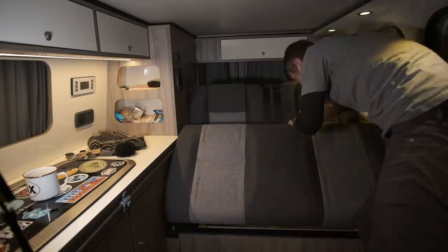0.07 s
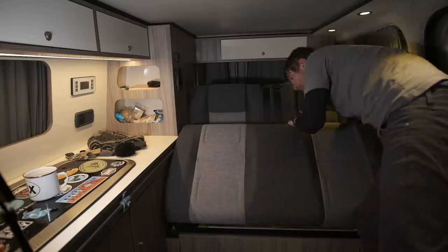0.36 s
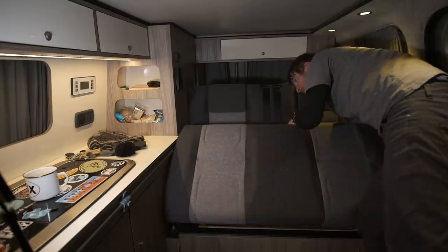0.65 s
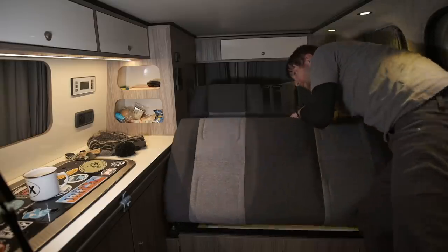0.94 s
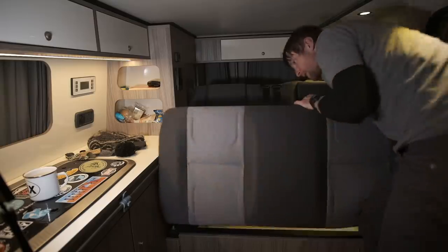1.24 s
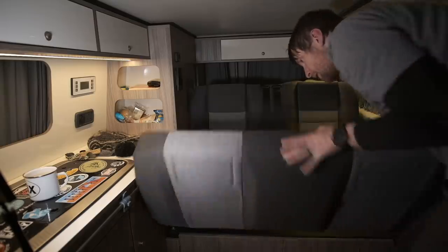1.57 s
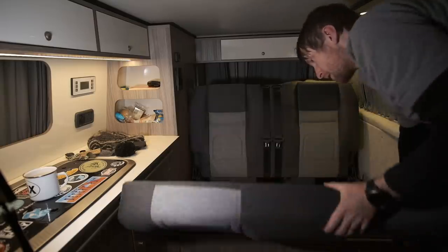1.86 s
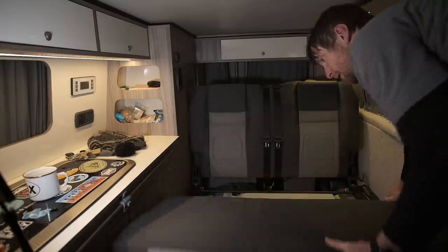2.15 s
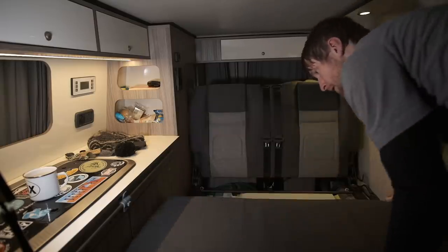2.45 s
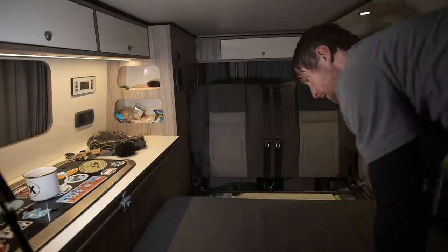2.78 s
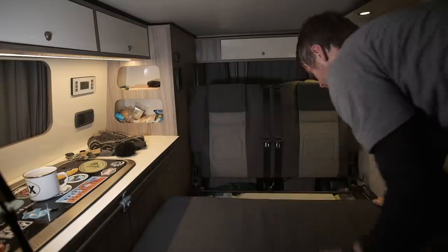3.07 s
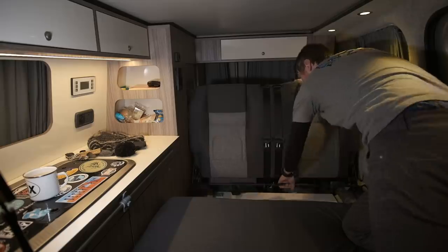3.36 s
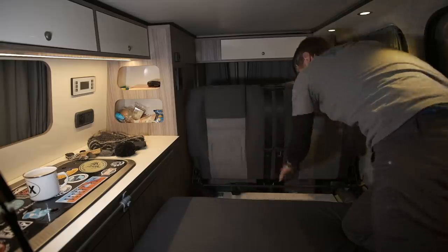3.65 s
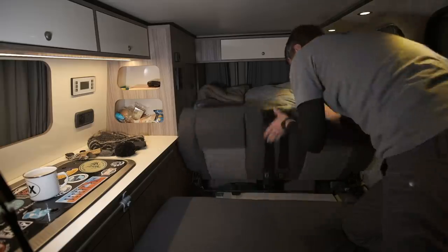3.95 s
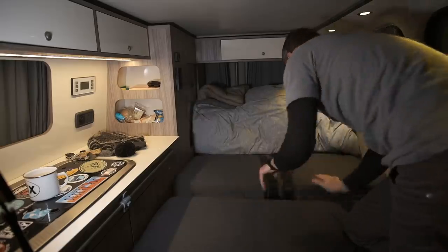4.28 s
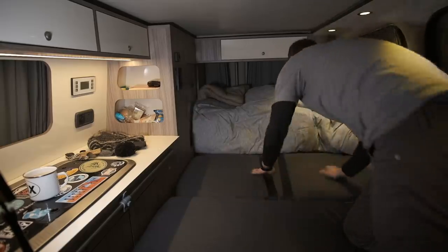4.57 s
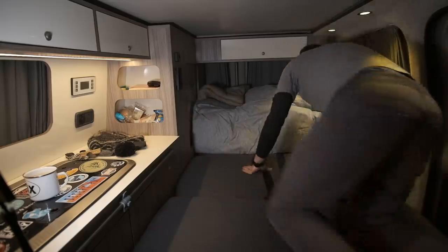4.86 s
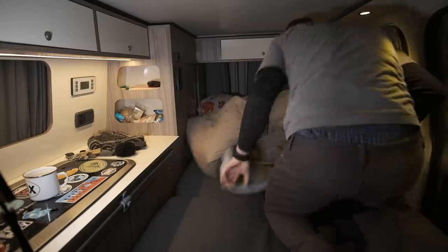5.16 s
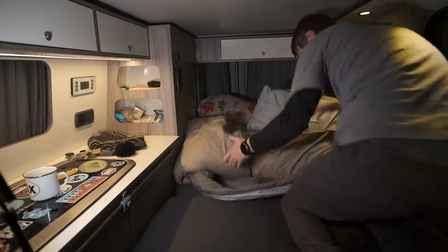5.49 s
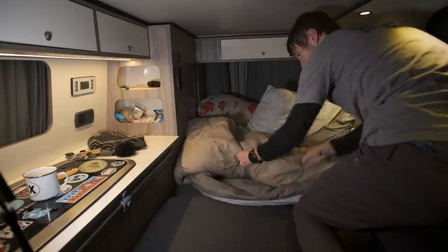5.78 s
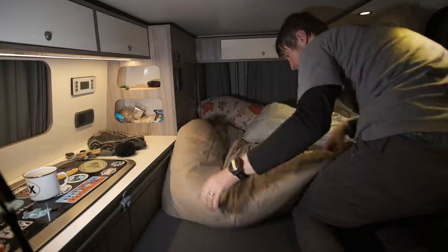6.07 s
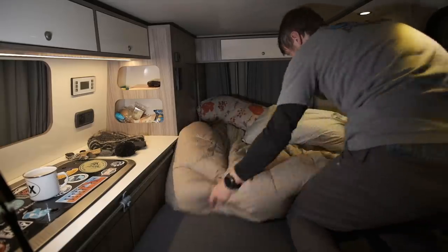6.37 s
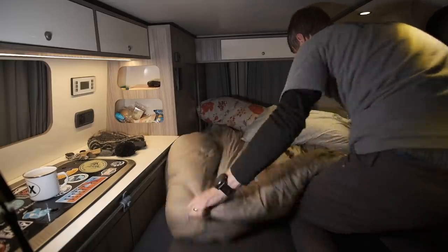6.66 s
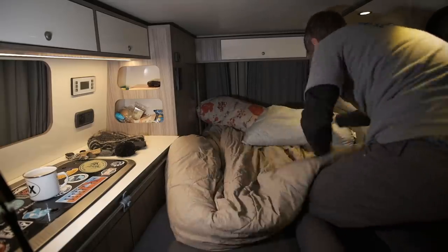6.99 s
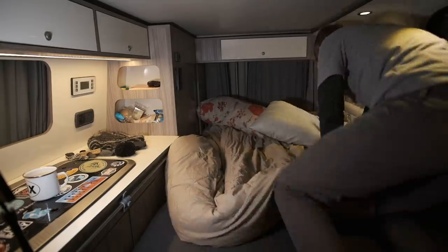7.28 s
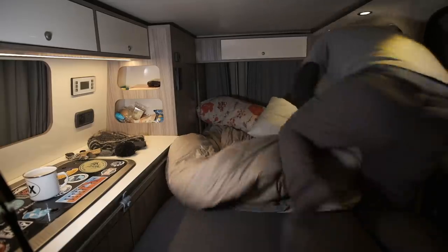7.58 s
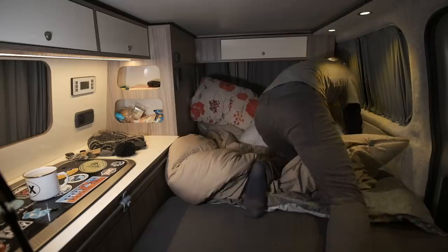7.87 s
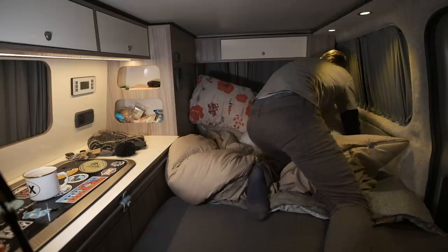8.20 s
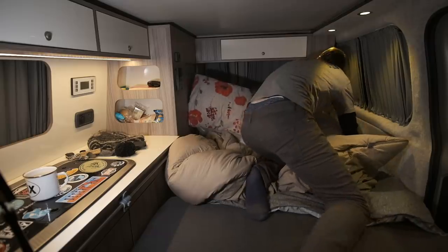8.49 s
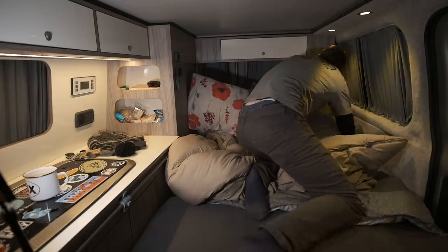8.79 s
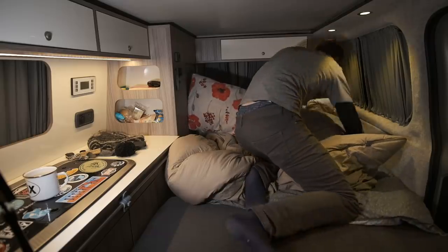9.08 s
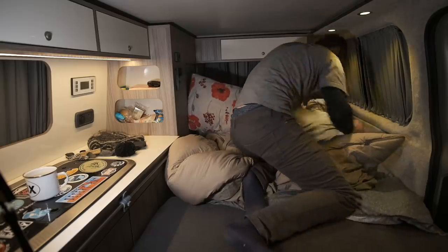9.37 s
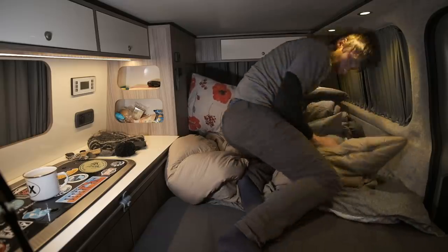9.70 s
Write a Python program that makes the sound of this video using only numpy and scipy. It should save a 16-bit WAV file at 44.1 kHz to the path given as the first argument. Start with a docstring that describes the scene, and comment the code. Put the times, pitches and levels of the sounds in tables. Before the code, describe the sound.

Upholstery rustles, steel catches snap and a backrest bounces down inside a camper van, then bedding is softly dragged about.

```python
"""Upholstery rustles and squeaks, then a steel catch snaps: a camper van seat is being folded into a bed.
The cushion swings over and lands on the floor. The backrest is unlatched, drops flat and bounces to rest
while the linkage rattles, a belt buckle jingles and the van body booms. Then a duvet is dragged over
the bed, with soft bumps and a few knocks on the furniture. Blows are ringing modes plus the padded
cabin's short reflections; cloth is friction noise that swells with each stroke."""
import sys
import numpy as np
from scipy import signal
from scipy.fft import rfft, irfft, next_fast_len
from scipy.io import wavfile
from scipy.ndimage import uniform_filter1d, map_coordinates

SR = 44100
rng = np.random.default_rng(int(sys.argv[2]) if len(sys.argv) > 2 else 0)


def to_wav(s):
    """Save 16-bit WAV."""
    ch = np.atleast_2d(s).T  # columns
    pcm = np.round(np.clip(ch, -1, 1) * 32767)  # PCM
    wavfile.write(sys.argv[1], SR, pcm.astype(np.int16))


N = 429534
GRAZE_SAMPLES = SR // 40  # lead-in before a blow

# The backrest bounces ever faster. Each entry: start in seconds.
BOUNCE_TIMES = [4.471, 4.62, 4.729, 4.803, 4.863, 4.916, 4.963]


def catches():
    """Steel catches snap with a bright clang."""
    # Each row: start in seconds, contact time in seconds, clang in Hz, then level, hardness, thud in dB.
    snaps = [(2.1085, 0.00086, 1230, -18.5, 10, -21), (3.405, 0.0011, 1700, -26.5, -11.5, -0.5),
             (3.519, 0.0031, 2470, -30.5, 2.5, -4.5), (3.922, 0.0013, 1560, -19.5, -1.5, 5)]
    # Resonances of the steel. Each row: pitch in Hz, width in Hz, level in dB.
    modes = [(254.3, 25, -14), (393, 50, -11), (520, 130, -3.5), (744, 26, 2.5), (1250, 69, -18),
             (1790, 58, -6), (2150, 99, -3), (2200, 97, -3.5), (2910, 96, -13), (3065, 20, -13),
             (3330, 98, 0), (5100, 90, -5), (6210, 86, -7), (6460, 100, -2.5), (8900, 83, -18.5)]
    # Registers from thud to sizzle. Each row: level in dB, share of the hardness.
    colour = [(-1.5, 0), (-0.5, 0.0057), (0, 0.17), (-7, .6), (-18.5, 1), (-28.5, 1.2)]
    return amp(-0.5) * blows(snaps, modes, colour, damping=1.63, tail_db=-37, clang_db=9.5,
                             graze_db=-23.5, bright=2.7, ring_db=3)


def landings():
    """Cushion and backrest land, ringing frame and floor; each bounce is shorter, weaker and duller."""
    # Each row: start in seconds, contact time in seconds, clang in Hz, then level, hardness, thud in dB.
    drops = [(2.728, .007, 245, -21, 10, 2.5), (4.239, .004, 1633, -16, -8, -10.5),
             (4.251, 0.0035, 1833, -22, -7.5, -2.5), (4.283, .002, 1160, -26.5, 7.5, 10),
             (4.311, 0.01, 1145, -32, 2.5, -6.5), (4.397, .006, 1650, -49, 14, 7)]
    # Resonances of frame and floor. Each row: pitch in Hz, width in Hz, level in dB.
    frame_modes = [(324.4, 25, -13), (390, 230, -8.5), (520, 65, -6.5), (734, 20, -0.5), (1180, 70, -5),
                   (1300, 46, -2.5), (1702, 95, 0.5), (1950, 210, -11.5), (3165, 55, -3), (5000, 96, -5.5),
                   (5600, 49, -7.5), (6460, 68, -1.5), (7600, 130, 2.5), (8600, 43, 1)]
    floor_modes = [(103, 19.6, -8), (150, 47, 2), (229, 69, -1.5), (346, 30, -12)]
    # Registers from thud to sizzle. Each row: level in dB, share of the hardness.
    colour = [(4, 0.059), (.5, 0), (-0.5, 0.11), (-9, 0.3), (-17.5, 1.2), (-33, 1.4)]
    first_db, loss_db = np.array([-23, 1.5, 5]), np.array([3, 3, 1.1])  # level, hardness, thud
    bounces = []
    for k, start in enumerate(BOUNCE_TIMES):
        contact_s = 0.011 * 0.79 ** k
        clang_hz = 1240 * np.exp(0.108 * rng.standard_normal())
        bounces.append((start, contact_s, clang_hz, *(first_db - k * loss_db)))
    return amp(1) * blows(drops + bounces, frame_modes + floor_modes, colour, damping=0.99, tail_db=-14,
                          clang_db=-0.5, graze_db=-9, bright=0.24, ring_db=0)


def body_booms():
    """The van body flexes under heavy blows and under each bounce, pumping the air of the cabin."""
    # Each row: start in seconds, relative level in dB, pitch in Hz, t60 in seconds.
    booms = [(.75, -36, 39.8, 0.46), (2.74, -26, 35, 0.3), (2.817, -24.5, 27.5, 1), (3.78, -33, 37.2, .77),
             (4.285, -6.5, 35.5, 0.15), (4.355, -5, 84, 0.087), (4.476, -9.5, 89, 0.079),
             (6.1, -39, 59, 0.18), (8.0, -38.5, 29.7, .7), (8.974, -33, 29, 0.84),
             (8.994, -31.5, 130.7, 0.16)]
    bounces = [(start, -4 - 4 * k, 37, 0.14) for k, start in enumerate(BOUNCE_TIMES)]
    track, t = np.zeros(N), np.arange(SR) / SR
    onset = 1 - np.exp(-t / 0.008)
    for start, db, hz, t60 in booms + bounces:
        add(track, start, -amp(db - 60 * t / t60) * onset * np.sin(2 * np.pi * hz * t))
    return amp(5.5) * track


def linkage():
    """The loose linkage ticks as the seat moves and chatters twice after every bounce."""
    # Each row: start in seconds, relative level in dB.
    ticks = [(.0266, -39), (.1766, -38.5), (2.803, -19.5), (2.8256, -23), (2.8644, -30), (2.8893, -23),
             (2.954, -32.5), (3.0625, -45), (3.1517, -40), (3.3074, -32), (3.3443, -49), (3.4625, -37),
             (3.757, -31.5), (4.541, -19.5)]
    # Resonances of the links. Each row: pitch in Hz, width in Hz, level in dB.
    modes = [(1742, 130, -5.5), (2085, 71, -10), (2350, 41, -9.5), (2820, 100, -14), (3220, 150, -14.5),
             (5140, 150, -27.5)]
    spacing_s = 0.012
    jitter = rng.uniform(-0.41, 0.59, (len(BOUNCE_TIMES), 2))
    chatter = [(start + spacing_s * (n + 1 + jitter[k, n]), -16 - 2.5 * k - 4 * n)
               for k, start in enumerate(BOUNCE_TIMES) for n in range(2)]
    return amp(-8) * clicks(ticks + chatter, modes, noise_t60=0.059, noise_db=-4.5,
                            noise_hz=(905, 3950), attack_s=0.0016)


def buckle():
    """The shaken belt buckle jingles in high, narrow modes."""
    # Each row: start in seconds, relative level in dB.
    jingles = [(3.589, -39.5), (3.6144, -40.5), (3.803, -44.5), (4.080, -19.5), (4.0994, -45)]
    # Resonances of the buckle. Each row: pitch in Hz, width in Hz, level in dB.
    modes = [(5500, 15, -3), (5750, 10, -5), (7350, 11, -1.5), (8231, 24, -5.5), (9055, 16, -8.5),
             (9250, 16, -1.5), (11200, 40, -18)]
    return amp(-5) * clicks(jingles, modes, noise_t60=0.07, noise_db=-2,
                            noise_hz=(3500, 12000), attack_s=0.0024)


def upholstery():
    """The seat cover rubs and swishes as it is pushed and slid."""
    # Each row: start, rise, hold in seconds, rub level in dB, then swish and padding offsets in dB.
    pushes = [(-.05, 0.023, 0.11, -65, -5, 16), (.5, 0.033, 0.29, -65, -3, 16),
              (.86, .08, 0.15, -53, -3.5, 1), (1.03, 0.086, 0.08, -48, -2.5, -2),
              (1.18, 0.066, .08, -49, -5.5, 6.5), (1.35, 0.115, .24, -51, -0.5, 5),
              (1.67, 0.024, 0.028, -45.5, 0, 0), (1.74, 0.046, 0.3, -45, -10.5, 7),
              (1.98, 0.1, 0.014, -48.5, -1, 4), (2.2, 0.14, 0.13, -56, -12, 8),
              (2.64, 0.055, .25, -51, -12, 13), (3.02, .05, 0.16, -61, -3.5, 8.5),
              (3.29, 0.052, 0.12, -51.5, -10.5, 14.5), (3.52, 0.048, 0.076, -51, -5, 19.5),
              (3.73, 0.066, .14, -41, -16.5, 13), (3.95, 0.036, 0.18, -36, -12.5, 7.5),
              (4.2, 0.077, 0.53, -48.5, -2.5, 22.5)]
    # Spectra of the folds and the weave. Each row: frequency in Hz, level in dB.
    rub = [(210, -35), (350, -3.5), (392, -11.5), (498, -2), (760, -4.5), (932, -8), (1150, -7),
           (1750, -12.5), (2300, -13), (3400, -21.5), (4420, -29.5), (7480, -120)]
    swish = [(1800, -28), (2900, 0), (3700, -0.5), (5000, -2.5), (6400, -3), (7800, -6.5), (9200, -6),
             (11000, -13), (14000, -13.5), (16000, -18)]
    return fabric(pushes, rub, swish, grain_db=-6.5, patchy_db=2.5)


def duvet():
    """The duvet is pulled and patted over the bed; folds of its cover snap over."""
    # Each row: start, rise, hold in seconds, rub level in dB, then swish and padding offsets in dB.
    pulls = [(4.96, 0.05, 0.27, -51.5, 2, 9.5), (5.01, 0.18, 0.02, -44.5, -0.5, -12),
             (5.36, 0.1, 0.09, -56, 0, 10), (5.59, 0.023, 0.11, -49, -1, 4.5),
             (5.8, 0.19, 0.084, -51, -2.5, 7.5), (6.14, 0.084, 0.027, -49.5, 0, -6),
             (6.31, 0.013, .15, -50, -5.5, 5.5), (6.52, 0.037, .17, -49.5, -2.5, 6),
             (7.0, 0.031, 0.018, -46.5, -9, 5), (7.08, 0.04, 0.218, -54.5, 0.5, -1),
             (7.44, 0.086, 0.099, -53.5, 0.5, 3), (7.72, 0.068, 0.57, -63.5, -3, 16.5),
             (8.36, 0.11, 0.19, -54, -3.5, 4.5), (8.7, 0.071, 0.23, -58.5, -2, 12.5),
             (9.08, .05, 0.4, -63.5, -1.5, 3), (9.49, 0.066, 0.16, -55.5, -4.5, 0.5)]
    # Spectra of the folds and the weave. Each row: frequency in Hz, level in dB.
    rub = [(210, -25), (350, -4.5), (760, -2.5), (941, -7), (1420, -8.5), (2100, -10), (2950, -14.5),
           (3400, -14), (4420, -21.5), (7480, -120)]
    swish = [(1800, -5), (3000, -1.5), (5500, 0.5), (9000, -1), (10800, -8), (14000, -8.5), (16000, -16.5)]
    # Snapping folds. Each row: start in seconds, relative level in dB.
    creases = [(5.8411, -34.5), (6.0914, -49), (6.6702, -32), (6.6942, -28.5), (7.007, -41.5),
               (7.0694, -34), (7.3772, -31), (7.5043, -35), (7.8837, -39.5)]
    # Resonances of a fold. Each row: pitch in Hz, width in Hz, level in dB.
    modes = [(1540, 420, 5), (2800, 900, -7), (7000, 2500, -9)]
    sliding = fabric(pulls, rub, swish, grain_db=-4.5, patchy_db=1.5)
    snaps = clicks(creases, modes, noise_t60=0.048, noise_db=-2, noise_hz=(690, 6840), attack_s=0.00059)
    return sliding + amp(-6.5) * snaps


def furniture():
    """Hands and knees bump the cushions and knock on the furniture panels."""
    # Each row: start in seconds, contact time in seconds, pitch in Hz, then level, hardness, thud in dB.
    bumps = [(.478, 0.014, 135, -61, -2, 20.5), (0.742, 0.0064, 105, -49, -7, 6.5),
             (.858, 0.0076, 111, -53, -2, 3), (1.369, 0.0053, 234, -42, 2, 8),
             (1.5, 0.024, 210, -62.5, -2, 23.5), (1.759, 0.0011, 700, -35, -6, -3.5),
             (1.868, 0.00091, 1590, -41, 1.5, -6.5), (5.179, 0.0044, 220, -40.5, 1.5, 7.5),
             (5.868, .0025, 129, -57, -2, 10.5), (6.09, 0.0047, 110, -56, 7, 12.5),
             (6.138, 0.0017, 323, -49.5, -1, 3.5), (6.775, 0.0072, 109, -61.5, 3, 16.5),
             (7.848, 0.0022, 110, -51.5, 1.5, 1), (8.001, 0.014, 112, -54, 1.5, 11),
             (8.089, 0.0033, 111.5, -52.5, 2.5, 13.5), (8.914, 0.0069, 292, -39, -4.5, 6),
             (8.959, 0.0059, 283, -33.5, 5.5, 3.5), (9.515, .002, 236, -49, -5.5, 2),
             (9.537, .001, 295, -42, -9, 10)]
    # Resonances of the panels. Each row: pitch in Hz, width in Hz, level in dB.
    modes = [(138.6, 87, 0), (215.3, 33, -2), (287, 47, -1.5), (527, 18, 1), (710, 100, 0.5),
             (1320, 390, -7), (1850, 82, -46), (3200, 520, 5)]
    # Registers from thud to sizzle. Each row: level in dB, share of the hardness.
    colour = [(-1.5, 0), (-0.5, 0), (-6.5, 0.82), (-14, 0.97), (-20.5, 1), (-43, .7)]
    return amp(1.5) * blows(bumps, modes, colour, damping=1.3, tail_db=-19, clang_db=10,
                            graze_db=-7, bright=0.9, ring_db=0)


def squeaks():
    """Hinges and cushions stick and slip under load: short, wavering tones with some scrape."""
    # Each row: start in seconds, length in seconds, pitch in Hz, level in dB.
    slips = [(0.935, 0.023, 321, -40), (1.104, 0.051, 402, -45.5), (1.605, 0.041, 518, -43),
             (2.291, 0.045, 1910, -50), (2.342, 0.03, 1910, -46), (2.37, 0.022, 1970, -54),
             (9.349, .09, 2180, -64), (9.651, .12, 2110, -60)]
    track = np.zeros(N)
    for start, length, hz, db in slips:
        swell = np.hanning(int(length * SR))
        waver, scrape = rng.standard_normal((2, SR // 4))
        pitch = hz * (1 + 0.034 * unit(band(waver, 14.7, 285, order=1))[-len(swell):])
        tone = np.sin(2 * np.pi * np.cumsum(pitch) / SR)
        scrape = unit(band(scrape, hz / 2, 1.4 * hz, order=2))[-len(swell):]
        add(track, start, amp(db) * swell * (tone + amp(-12) * scrape))
    return track


def frame_hum():
    """A faint ring in the seat frame fades until a hand damps it."""
    # Each row: pitch in Hz, relative level in dB.
    partials = [(355.3, -61.5), (484.5, -75), (694.4, -75)]
    free_t60, hand_at_s, hand_t60 = 5, 0.58, 0.25
    t = np.arange(N) / SR
    tones = sum(amp(db) * np.sqrt(2) * np.sin(2 * np.pi * hz * t) for hz, db in partials)
    decay_db = 60 * t / free_t60 + 60 * np.maximum(t - hand_at_s, 0) / hand_t60
    return tones * amp(4 + wobble(6.4) - decay_db)


def cabin_air():
    """The still cabin: a faint, low, steady noise."""
    # Each row: frequency in Hz, relative level in dB.
    spectrum = [(12, -39.5), (20, -8), (101, -1.5), (158, -11), (187, -6), (357, -11.5), (422, -18),
                (5230, -32.5), (16000, -34)]
    return amp(-58.5) * coloured(rng.standard_normal(N), spectrum)


def blows(rows, modes, colour, **voicing):
    """All blows on one object: a hard one is brighter, a heavy one has more thud."""
    track = np.zeros(N)
    colour_db, hardness_share = np.transpose(colour)
    for start, contact_s, clang_hz, db, hardness_db, thud_db in rows:
        levels = db + colour_db + hardness_db * hardness_share
        levels[0] += thud_db
        add(track, start - GRAZE_SAMPLES / SR, blow(contact_s, clang_hz, levels, modes, **voicing))
    return track


def blow(contact_s, clang_hz, levels, modes, damping, tail_db, clang_db, graze_db, bright, ring_db):
    """One blow: the parts graze, grind together for the contact time and ring; the cabin answers."""
    # Thud to sizzle. Each row: low and high edge in Hz, t60 in seconds before damping, share of ringing.
    registers = [(98, 393, 0.19, .55), (398, 952, .16, .39), (950, 2220, 0.11, .42), (2250, 4780, .1, 0.35),
                 (5230, 9360, .073, .2), (10500, 14000, .07, .03)]
    t = np.arange(-GRAZE_SAMPLES, SR // 4) / SR
    since_hit, since_release = np.maximum(t, 0), np.maximum(t - contact_s, 0)
    press = np.minimum(since_hit / contact_s, 1)
    graze = amp(graze_db) * np.exp(np.minimum(t, 0) / (0.44 * contact_s))
    clang = (clang_hz, 45, clang_db)  # each point of contact has a mode of its own
    modal = press * ring([*modes, clang], since_hit)
    head = slice(GRAZE_SAMPLES, GRAZE_SAMPLES + int(0.03 * SR))  # the first 30 ms set the level
    sound = np.zeros(len(t))
    for db, (low_hz, high_hz, t60, share) in zip(levels, registers):
        early = burst(since_release, t60 / damping)
        tail = amp(tail_db) * burst(since_release, 2 * t60)
        diffuse = np.maximum(graze, press) * (early + tail)
        diffuse = band(diffuse, 7.1, bright * low_hz, order=1)  # padding dulls the reflections
        ringing = amp(ring_db) * np.sqrt(share) * unit(band(modal, low_hz, high_hz))
        part = ringing + np.sqrt(1 - share) * unit(band(diffuse, low_hz, high_hz))
        sound += amp(db) * part / np.sqrt(np.mean(part[head] ** 2))
    return sound


def clicks(rows, modes, noise_t60, noise_db, noise_hz, attack_s):
    """Small, light contacts: a short scratch and a ring."""
    track, t = np.zeros(N), np.arange(SR // 2) / SR
    for start, db in rows:
        ringing = unit(ring(modes, t))
        scratch = amp(noise_db) * unit(band(burst(t, noise_t60), *noise_hz, order=2))
        sound = (ringing + scratch) * (1 - np.exp(-t / attack_s))
        add(track, start, amp(db) * sound / np.abs(sound).max())
    return track


def ring(modes, t):
    """Damped modes, struck with new strengths every time; wide ones die fast."""
    hz, width, db = np.transpose(modes)[:, :, None]
    strength = amp(db + rng.normal(0, 0.67, db.shape)) * np.sqrt(width)
    phase = 2 * np.pi * (hz * t + rng.random(hz.shape))
    return np.sum(strength * np.exp(-np.pi * width * t) * np.sin(phase), 0)


def fabric(rows, rub_colour, swish_colour, grain_db, patchy_db):
    """Cloth slides unevenly: folds rub, the weave swishes, padding shifts, the van rocks on its springs."""
    # Spectra of the padding and the rocking van. Each row: frequency in Hz, level in dB.
    shuffle_colour = [(35, -22), (60, -3.5), (100, -3), (160, -4.5), (300, -5.5), (380, -12), (450, -11),
                      (600, -31.5), (1000, -100)]
    sway_colour = [(8, 10), (20, 3.5), (38, -0.5), (65, -6), (110, -29), (300, -100)]
    rubbing, swishing, weight = strokes(rows)
    speed = wobble(22)
    padding = coloured(patchy(rng.standard_normal(N), depth_db=3.5), shuffle_colour)
    shuffle = weight * amp(-5.5 + 0.5 * speed + 0.84 * wobble(30)) * padding
    folds = coloured(patchy(fibres(slips_per_s=400, grain_db=grain_db), patchy_db), rub_colour)
    rub = rubbing * amp(-1.5 + 1.9 * speed) * folds
    weave = coloured(patchy(fibres(slips_per_s=680, grain_db=-6), depth_db=1.6), swish_colour)
    swish = swishing * amp(-3 + 0.78 * speed) * weave
    sway = weight * amp(-4.5) * coloured(rng.standard_normal(N), sway_colour)
    return shuffle + rub + swish + sway


def strokes(rows, settle_t60=0.56):
    """Gains of rub, swish and weight on the padding: each stroke gathers speed, holds and settles."""
    power, t = np.zeros((3, N)), np.arange(2 * SR) / SR
    for start, rise, hold, db, swish_db, weight_db in rows:
        shape = np.minimum(t / rise, 1) * amp(-60 * np.maximum(t - rise - hold, 0) / settle_t60)
        for track, offset_db in zip(power, (0, swish_db, weight_db)):
            add(track, start, (amp(db + offset_db) * shape) ** 2)
    return np.sqrt(power)


def fibres(slips_per_s, grain_db):
    """Cloth friction: a hiss of countless fibres plus single threads that catch and slip."""
    slips = (rng.random(N) < slips_per_s / SR) * rng.standard_normal(N)
    hiss = rng.standard_normal(N)
    grain = burst(np.arange(SR // 50) / SR, t60=0.016)
    return hiss + amp(grain_db) * unit(signal.fftconvolve(slips, grain)[:N])


def patchy(x, depth_db):
    """Folds shift the colour of a rubbing sound from moment to moment."""
    spectra = signal.stft(x, nperseg=1024)[2]
    patches = uniform_filter1d(rng.standard_normal(spectra.shape), size=4, axis=0)  # across frequency
    patches = uniform_filter1d(patches, size=7, axis=1)  # across time
    return signal.istft(spectra * amp(depth_db * unit(patches)), nperseg=1024)[1][:N]


def burst(t, t60):
    """Noise dying away."""
    return rng.standard_normal(len(t)) * amp(-60 * t / t60)


def wobble(rate):
    """A smooth random curve, rate knots a second."""
    return map_coordinates(rng.standard_normal(int(N * rate / SR) + 4), [np.arange(N) * rate / SR])


def coloured(x, points):
    """x through a spectrum of (Hz, dB) points, at rms 1."""
    size = next_fast_len(N + 8192)
    hz, db = np.transpose(points)
    gain = amp(np.interp(np.log(np.fft.rfftfreq(size, 1 / SR) + 1), np.log(hz), db))
    return unit(irfft(rfft(x, size) * gain, size)[:N])


def band(x, low_hz, high_hz, order=3):
    """Causal band-pass."""
    edges = [low_hz, min(high_hz, SR / 2 - 100)]
    return signal.sosfilt(signal.butter(order, edges, 'band', fs=SR, output='sos'), x)


def add(track, start, sound):
    """Mix a sound into the track, start in seconds."""
    part = track[max(round(start * SR), 0):][:len(sound)]
    part += sound[:len(part)]


def amp(db):
    """Decibels to gain."""
    return 10 ** (np.asarray(db) / 20)


def unit(x):
    """Scale to rms 1."""
    return x / np.sqrt(np.mean(x ** 2) + 1e-20)


def scene():
    """Everything heard from one spot in the cabin; the hands go from the seat to the duvet."""
    cloth = upholstery() + duvet()
    cabin = furniture() + cabin_air()
    seat = catches() + landings() + linkage() + buckle() + frame_hum() + squeaks()
    return (seat + body_booms() + cloth + cabin)[None]


def record(dry):
    """The loudest peaks are rounded off at full scale and the highest treble is cut."""
    top_hz = 15900
    rounded = dry / (1 + np.abs(dry) ** 6) ** (1 / 6)
    size = next_fast_len(N + 8192)
    passband = np.fft.rfftfreq(size, 1 / SR) < top_hz
    return irfft(rfft(rounded, size) * passband, size)[:, :N]


dry = scene()
out = record(dry)
to_wav(out)
```